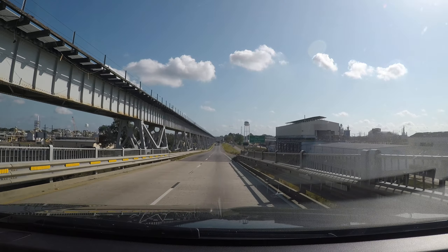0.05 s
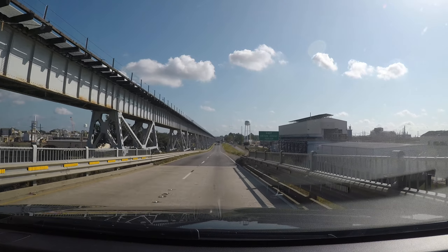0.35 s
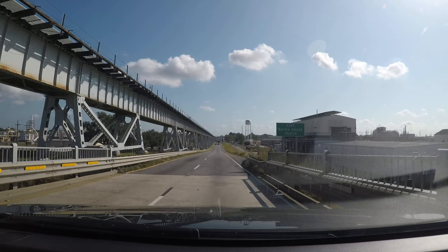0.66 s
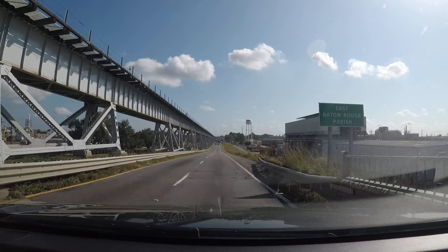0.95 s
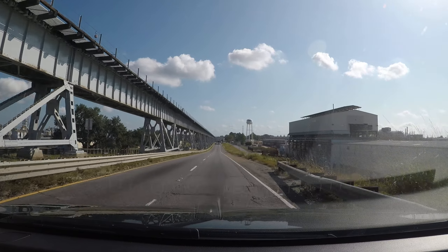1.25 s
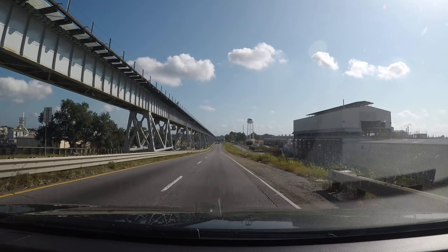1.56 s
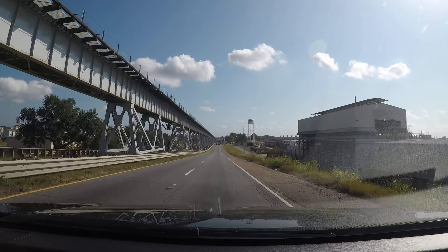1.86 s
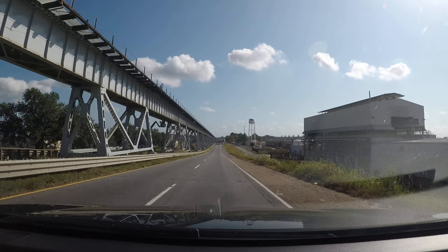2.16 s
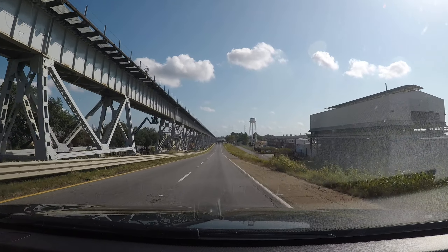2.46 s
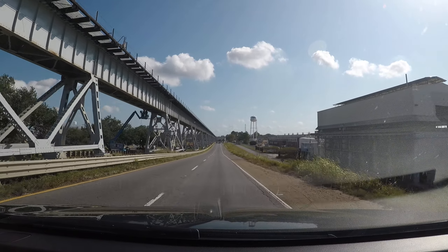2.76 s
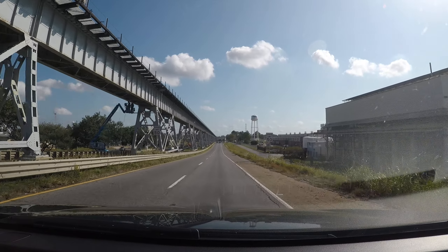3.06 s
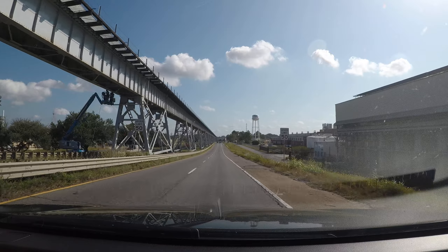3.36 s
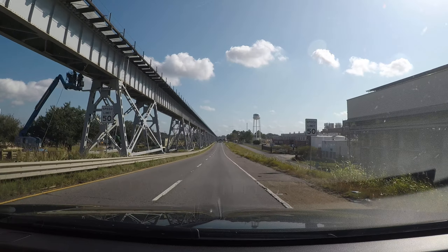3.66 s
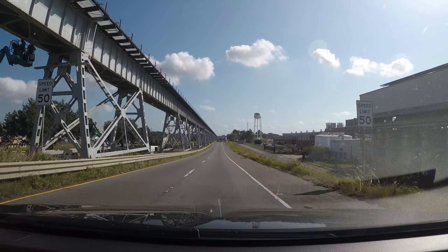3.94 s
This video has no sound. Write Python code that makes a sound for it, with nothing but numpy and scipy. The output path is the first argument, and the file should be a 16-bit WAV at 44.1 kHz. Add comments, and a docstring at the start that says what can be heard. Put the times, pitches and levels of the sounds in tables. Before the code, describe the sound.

A car rumbles along at steady speed, heard from the dashboard, with tyre roar over a faint engine hum. Bridge joints thump the cabin at about 0.2 seconds and, harder, at 1.2 seconds, setting loose trim lightly rattling and clicking. Near 1.5 and 2.6 seconds, deeper bumps clunk the suspension and make the body boom. Around 3.4 seconds a hollow tyre drone grows on the asphalt.

```python
"""Inside a car leaving a bridge at steady speed, heard from the dashboard.
From the start the body rumbles, the cabin booms and the tyres roar over a faint engine hum.
From 0.24 s joints and bumps knock the tyres, thump the cabin and shake loose trim into rattles.
Near 1.5 s and 2.6 s deeper bumps clunk the suspension and set body panels booming.
Near 3.4 s the hollow tread drone grows on the asphalt."""
import sys
import numpy as np
from scipy import signal
from scipy.fft import rfft, irfft, dct, next_fast_len
from scipy.io import wavfile
from scipy.ndimage import uniform_filter1d, minimum_filter1d, map_coordinates

SR = 44100
rng = np.random.default_rng(int(sys.argv[2]) if len(sys.argv) > 2 else 0)


def dump(signal):
    """Clip the signal to [-1, 1] and save it as 16-bit WAV at the path in sys.argv[1]."""
    limited = np.clip(np.atleast_2d(signal).T, -1, 1)
    pcm = np.round(limited * 32767).astype(np.int16)
    wavfile.write(sys.argv[1], SR, pcm)


N = 176400

# body rumble, cabin boom, tyre cavity hum, tread drone: t/s, relative level/dB
RUMBLE_DB = [(0, -16), (.3, -12), (.44, -9.5), (.66, -15), (.83, -15.5), (.96, -10.5), (1.05, -16.5),
             (1.2, -11), (1.55, -11), (1.63, -8), (1.83, -15), (2.09, -21.5), (2.32, -16.5), (2.6, -16),
             (2.82, -10.5), (3.25, -14.5), (3.57, -17.5), (3.86, -10.5), (4, -16)]
BOOM_DB = [(0, -17), (.5, -18.5), (.95, -20), (1.15, -19), (1.95, -16.5), (2.45, -22), (3.05, -21),
           (3.42, -26), (3.8, -16.5), (4, -25)]
CAVITY_DB = [(0, -33), (.3, -27.5), (.7, -33.5), (1.2, -32.5), (1.53, -29.5), (1.8, -31), (2.35, -29.5),
             (3.05, -32.5), (3.55, -35), (4, -45)]
TREAD_DB = [(0, -38.5), (1.3, -35), (2.3, -38), (3.15, -41), (3.45, -28), (3.8, -33), (4, -32)]
# tyre roar and air hiss: t/s, roar level/dB, hiss level/dB
ROAR_HISS_DB = [(0, -28.5, -56), (.8, -29.5, -56), (1.6, -29.5, -53), (1.95, -31.5, -58.5),
                (2.35, -29, -58.5), (2.7, -29, -54), (3, -31.5, -53.5), (3.45, -30.5, -54), (4, -31, -53)]
# noise spectra of the sources: f/Hz, relative density/dB
RUMBLE_SPECTRUM = [(8, -47.5), (20, 5), (35, -1.5), (52, 4.5), (66, 8.5), (80, -1), (100, -6), (200, -95)]
BOOM_SPECTRUM = [(60, -34), (86, -2), (105, -3.5), (137, 2.5), (160, -10.5), (220, -25.5), (400, -79)]
CAVITY_SPECTRUM = [(120, -34.5), (170, -2.5), (195, 12), (216, 6.5), (235, 6), (275, 10.5), (330, -7.5),
                   (430, -44.5)]
ROAR_SPECTRUM = [(100, -23.5), (200, -5.5), (270, -5), (350, -1), (410, -7.5), (510, -2.5), (575, -7.5),
                 (635, -4.5), (750, -15), (880, -10), (1150, -16.5), (1500, -27), (2200, -37),
                 (3200, -47.5), (8000, -88)]
TREAD_SPECTRUM = [(200, -31), (310, -0.5), (365, 3.5), (450, 0), (560, -14), (900, -61)]
HISS_SPECTRUM = [(800, 2), (2000, 8), (3000, 0), (4200, 2.5), (5200, -2), (7000, -4.5), (10200, -6),
                 (11500, -7), (13500, -13), (15200, -24.5)]
SLAP_SPECTRUM = [(250, -28), (400, -16.5), (480, -1), (620, -0.5), (720, 4), (800, -19), (1100, -28),
                 (2000, -57)]
RATTLE_SPECTRUM = [(600, -26), (1600, 7), (2600, -1.5), (3900, 3), (5500, -1), (8000, -6), (10500, -10.5),
                   (15200, -15)]
CLUNK_SPECTRUM = [(110, -6), (170, -10), (280, 3.5), (420, -3), (700, -13), (1000, -12.5), (1600, -32.5),
                  (3000, -41), (6000, -75)]
# engine orders: multiple of the firing rate, level/dB
ENGINE_ORDERS = [(1, -30), (2, -29), (4, -40)]
# tyre knocks on joint lips: t/s, level/dB, f/Hz, rise/s, t60/s
TYRE_KNOCKS = [(.238, -27, 476, 0.0091, 0.13), (.256, -23.5, 605, 0.0051, 0.15),
               (1.199, -11.5, 510, .009, .035), (1.21, -10.5, 620, 0.0056, 0.074),
               (1.328, -26.5, 639, .015, 0.16), (1.578, -26, 661, 0.0089, .25)]
# wheels meeting joints and bumps: t/s, thump gain/dB, slap level/dB, slap rise/s
WHEEL_BUMPS = [(0.239, -13.5, -30.5, 0.021), (1.201, -10.5, -22, 0.019), (1.492, -13.5, -33.5, 0.017),
               (1.533, -11, -36, 0.013), (2.627, -12.5, -30, 0.0074), (2.873, -17.5, -52, .01)]
# cabin modes rung by a bump: f/Hz, relative level/dB, t60/s
THUMP_MODES = [(56, -1, 0.092), (110.3, 4, 0.34), (134.1, -4, 0.49), (188.5, -6, 0.18), (255.5, -23, 0.035)]
# loose trim bursts: t/s, level/dB, rise/s, t60/s
TRIM_RATTLES = [(.257, -47, 0.01, 0.13), (.29, -48, .01, 0.1), (1.246, -45, 0.014, 0.22),
                (1.265, -40.5, 0.014, 0.054), (1.375, -49.5, 0.018, 0.16), (1.462, -47.5, 0.016, .1),
                (1.483, -38, 0.0085, 0.21), (1.53, -39.5, .007, 0.23), (1.55, -41, 0.013, 0.27),
                (1.614, -41.5, 0.02, 0.23), (1.657, -45.5, .008, 0.15), (1.685, -50.5, 0.0091, 0.95),
                (1.784, -51, 0.022, 0.18), (2.64, -47, 0.034, 0.3), (2.69, -53, 0.023, .2),
                (2.78, -50, 0.011, 0.27), (3.385, -55, 0.022, .2), (3.63, -56, 0.028, 0.5)]
# hard plastic clicks: t/s, level/dB, centre f/Hz, half width/oct, t60/s
TRIM_CLICKS = [(0.274, -48, 5950, 0.78, 0.084), (1.27, -45.5, 7000, 0.52, .05),
               (1.385, -48.5, 8000, 0.61, .045), (1.4836, -30.5, 3000, 0.35, 0.03),
               (1.496, -32.5, 3940, 0.34, .02), (1.538, -37.5, 8000, 0.74, .03),
               (1.585, -35.5, 3940, 0.31, .022), (1.664, -46, 5000, 0.71, .04),
               (2.245, -50, 8500, 0.38, 0.052), (3.627, -47, 4150, 0.12, .05),
               (3.626, -47, 9050, 0.29, 0.083), (3.648, -55, 5000, 0.56, .22), (3.759, -52, 7500, .4, .05)]
# suspension clunks: t/s, level/dB, rise/s, t60/s
SUSPENSION_CLUNKS = [(1.464, -24, 0.014, 0.64), (2.625, -26.5, 0.018, 0.54)]
# body panel booms: t/s, level/dB, f/Hz, rise/s, t60/s
PANEL_SHUDDERS = [(1.51, -13.5, 138, .05, 0.11), (1.531, -10, 90.7, .025, 0.25),
                  (1.73, -6.5, 46.4, 0.099, 0.18), (2.635, -7.5, 104.2, 0.024, 0.16)]

SURFACE_WOBBLE_DB, HISS_WOBBLE_DB = 0.7, 0.27
FIRING_HZ, DRIFT_FRACTION, ORDER_WOBBLE_DB = 53.95, 0.00706, 4.0
THUMP_RISE_S, SLAP_T60_S = 0.012, 0.1
CONTACTS_PER_S = 2200
LIMITER_CEILING = 0.8
TREBLE_KNEE_HZ, TREBLE_DB_PER_OCT, TOP_HZ = 9880, -24.5, 15200


def amp(db):
    """dB to gain."""
    return 10 ** (np.asarray(db) / 20)


def unit(x):
    """Scale to rms 1."""
    return x / np.sqrt(np.mean(x ** 2) + 1e-20)


def curves(rows):
    """Per-sample curve for each column after t/s."""
    times_s, *columns = np.transpose(rows)
    return [np.interp(np.arange(N) / SR, times_s, column) for column in columns]


def since(start_s):
    """Seconds since start_s, zero before."""
    return np.maximum(np.arange(N) / SR - start_s, 0)


def wobble(knots_per_s):
    """Smooth random curve, rms near 1."""
    knots = rng.standard_normal(int(N * knots_per_s / SR) + 4)
    return map_coordinates(knots, [np.arange(N) * knots_per_s / SR])


def filtered(x, response):
    """Filter x by response(hz)."""
    size = next_fast_len(N + 8192)
    return irfft(rfft(x, size) * response(np.fft.rfftfreq(size, 1 / SR)), size)[:N]


def coloured(x, spectrum):
    """x shaped by a spectrum table, rms 1."""
    points_hz, db = np.transpose(spectrum)
    return unit(filtered(x, lambda hz: amp(np.interp(np.log(hz + 1), np.log(points_hz), db))))


def drone(spectrum, evenness, window_samples=2200):
    """Band noise with its swells partly evened out, rms 1."""
    noise = coloured(rng.standard_normal(N), spectrum)
    power = np.abs(uniform_filter1d(np.abs(signal.hilbert(noise)) ** 2, size=window_samples))
    return unit(noise / (power + 1e-3) ** (evenness / 2))


def burst(start_s, rise_s, t60_s):
    """Envelope: linear rise to 1, exponential decay."""
    return np.minimum(since(start_s) / rise_s, 1) * amp(-60 * since(start_s + rise_s) / t60_s)


def resonance(start_s, db, hz, rise_s, t60_s):
    """Sine burst, random phase."""
    cycles = hz * since(start_s) + rng.random()
    return amp(db) * burst(start_s, rise_s, t60_s) * np.sin(2 * np.pi * cycles)


def body():
    """Uneven road shakes the body, the cabin air and the air in the tyres."""
    rumble_db, = curves(RUMBLE_DB)
    boom_db, = curves(BOOM_DB)
    cavity_db, = curves(CAVITY_DB)
    rumble = amp(rumble_db - 2.5) * drone(RUMBLE_SPECTRUM, evenness=0.63)
    boom = amp(boom_db - 3) * drone(BOOM_SPECTRUM, evenness=0.53)
    cavity = amp(cavity_db) * drone(CAVITY_SPECTRUM, evenness=0.11)
    return rumble + boom + cavity


def road():
    """Tyre roar through the closed cabin, hollow tread drone, thin air hiss."""
    roar_db, hiss_db = curves(ROAR_HISS_DB)
    tread_db, = curves(TREAD_DB)
    roar = amp(roar_db) * coloured(rng.standard_normal(N), ROAR_SPECTRUM)
    tread = amp(tread_db) * coloured(rng.standard_normal(N), TREAD_SPECTRUM)
    hiss = amp(hiss_db) * coloured(rng.standard_normal(N), HISS_SPECTRUM)
    tyres = amp(SURFACE_WOBBLE_DB * wobble(16)) * (roar + tread)
    return tyres + amp(HISS_WOBBLE_DB * wobble(25)) * hiss


def engine():
    """Hum of firing orders, each wavering in level."""
    firing_hz = FIRING_HZ * (1 + DRIFT_FRACTION * wobble(4.196))
    phase = 2 * np.pi * np.cumsum(firing_hz) / SR
    return sum(amp(db + ORDER_WOBBLE_DB * wobble(4.57)) * np.sqrt(2) * np.sin(order * phase)
               for order, db in ENGINE_ORDERS)


def tyre_knocks():
    """Tyres ring hollow on the lips of a joint."""
    return sum(resonance(*knock) for knock in TYRE_KNOCKS)


def cabin_thump(start_s):
    """Damped cabin modes swell as a tyre rolls over an edge."""
    t = since(start_s)
    modes = np.zeros(N)
    for hz, db, t60_s in THUMP_MODES:
        scatter_db, half_turns = rng.standard_normal(2)
        modes += amp(db + scatter_db - 60 * t / t60_s) * np.sin(2 * np.pi * hz * t + np.pi * half_turns)
    return (1 - np.exp(-(t / THUMP_RISE_S) ** 2)) * modes


def bumps():
    """Each edge thumps the cabin and slaps the tread."""
    slap = drone(SLAP_SPECTRUM, evenness=0.6, window_samples=600)
    out = np.zeros(N)
    for start_s, thump_db, slap_db, rise_s in WHEEL_BUMPS:
        out += amp(thump_db) * cabin_thump(start_s)
        out += amp(slap_db) * burst(start_s, rise_s, SLAP_T60_S) * slap
    return out


def trim_rattle():
    """Jolted loose trim: dense tiny contacts plus equal noise, in bursts that add in power."""
    contacts = unit((rng.random(N) < CONTACTS_PER_S / SR) * rng.standard_normal(N))
    chatter = coloured(contacts + rng.standard_normal(N), RATTLE_SPECTRUM)
    power = sum((amp(db) * burst(start_s, rise_s, t60_s)) ** 2
                for start_s, db, rise_s, t60_s in TRIM_RATTLES)
    return chatter * np.sqrt(power)


def trim_clicks():
    """Single hard plastic contacts, each with its own resonance."""
    out = np.zeros(N)
    for start_s, db, centre_hz, half_width_oct, t60_s in TRIM_CLICKS:
        noise = rng.standard_normal(N)
        band = filtered(noise, lambda hz: 1 / (1 + (np.log2((hz + 1) / centre_hz) / half_width_oct) ** 2))
        t = since(start_s)
        out += (t > 0) * amp(db - 60 * t / t60_s) * unit(band)
    return out


def suspension():
    """Dull, broad clunks as the springs take the deeper bumps."""
    envelope = sum(amp(db) * burst(start_s, rise_s, t60_s)
                   for start_s, db, rise_s, t60_s in SUSPENSION_CLUNKS)
    return envelope * coloured(rng.standard_normal(N), CLUNK_SPECTRUM)


def panel_shudders():
    """Floor and roof panels heave for a few cycles after hard jolts."""
    return sum(resonance(*shudder) for shudder in PANEL_SHUDDERS)


def scene():
    """Mono sum at the dashboard."""
    steady = body() + road() + engine()
    jolts = bumps() + tyre_knocks() + panel_shudders() + suspension()
    trim = trim_rattle() + trim_clicks()
    return (steady + jolts + trim)[None]


def record(dry):
    """Peak limiter, treble roll-off, cut at TOP_HZ."""
    needed_gain = np.minimum(1, LIMITER_CEILING / (np.abs(dry[0]) + 1e-9))
    gain = uniform_filter1d(minimum_filter1d(needed_gain, size=1200), size=900)
    hz = np.arange(N) * SR / (2 * N)
    above_knee_oct = np.log2(np.maximum(hz / TREBLE_KNEE_HZ, 1))
    response = amp(TREBLE_DB_PER_OCT * above_knee_oct) * (hz < TOP_HZ)
    spectrum = dct(dry[0] * gain, norm="ortho")
    return dct(spectrum * response, type=3, norm="ortho")[None]


dry = scene()
out = record(dry)
dump(out)
```